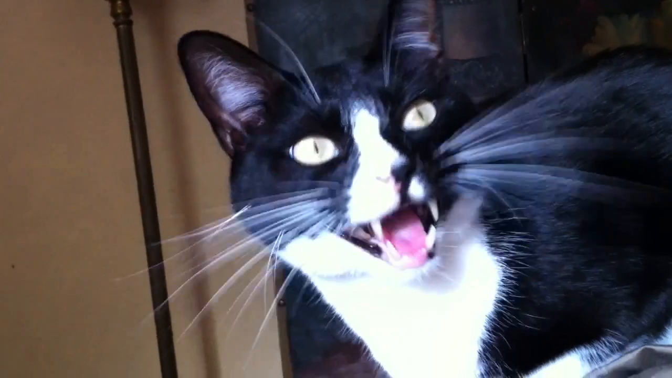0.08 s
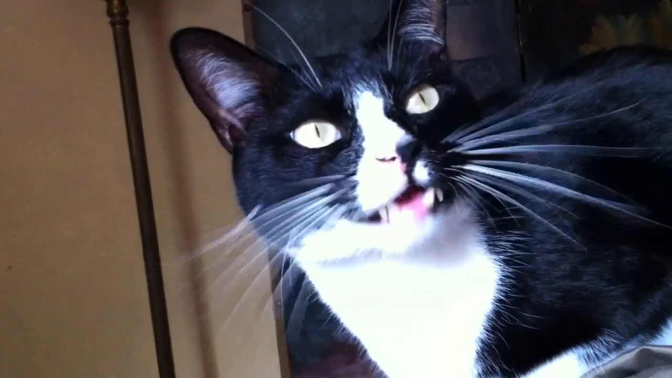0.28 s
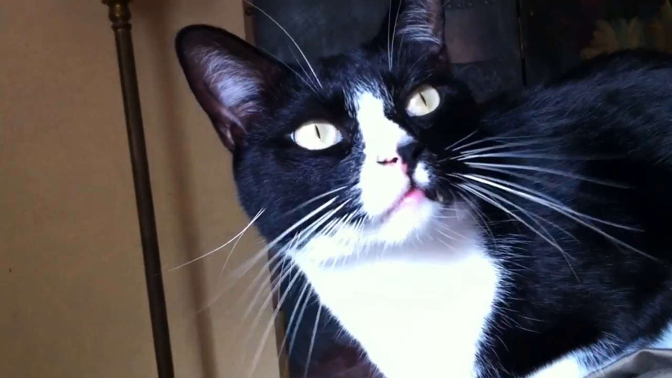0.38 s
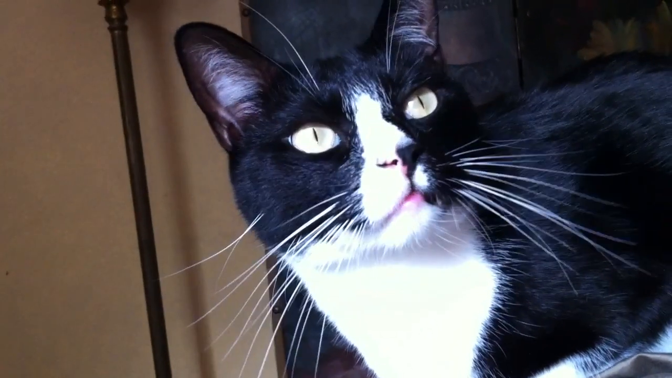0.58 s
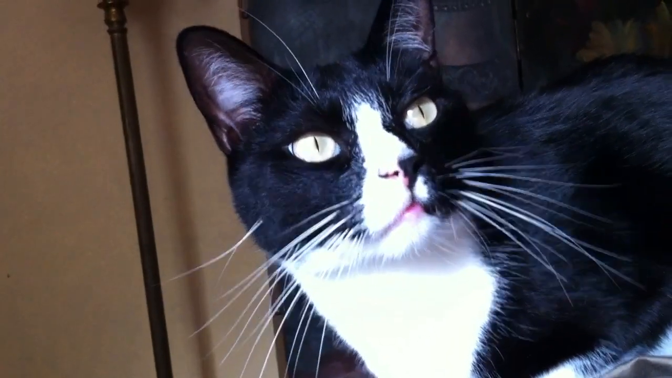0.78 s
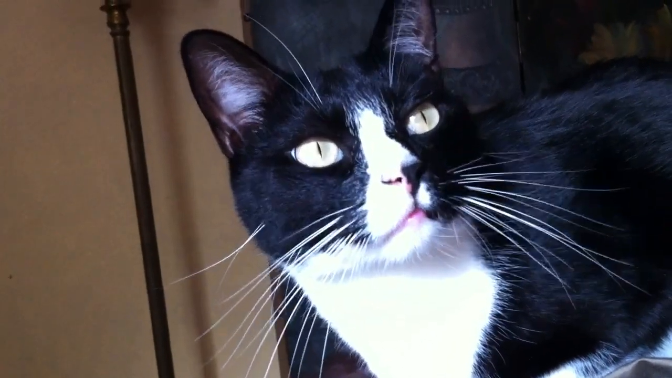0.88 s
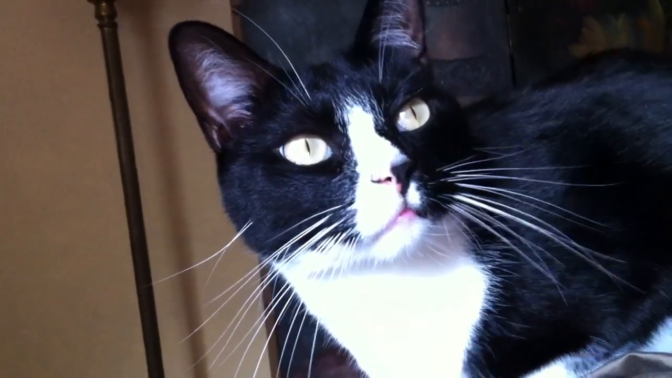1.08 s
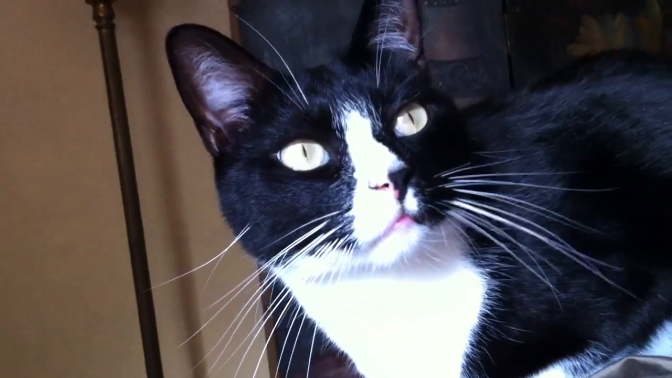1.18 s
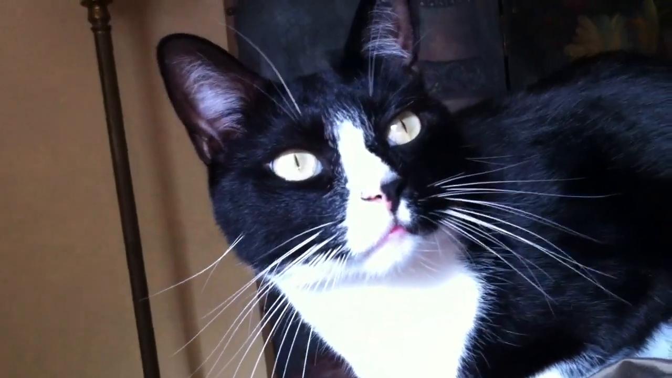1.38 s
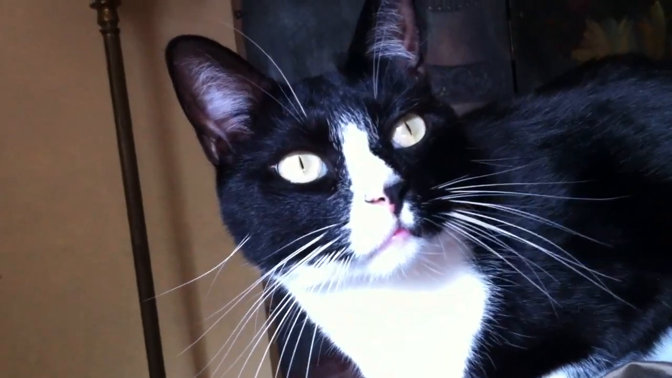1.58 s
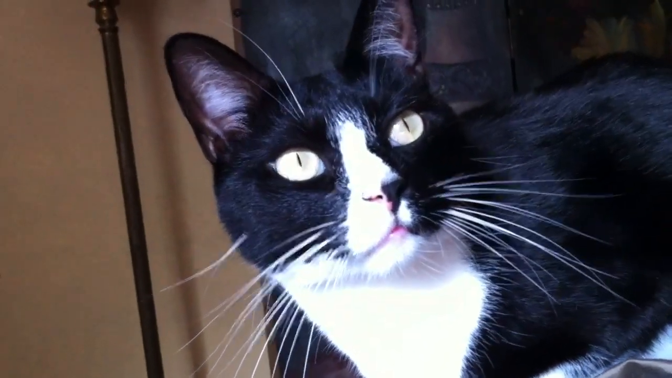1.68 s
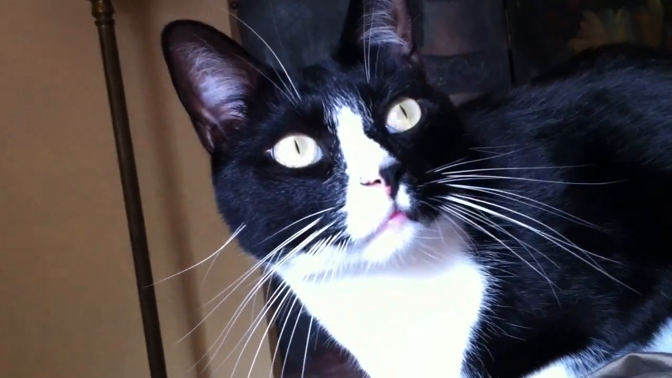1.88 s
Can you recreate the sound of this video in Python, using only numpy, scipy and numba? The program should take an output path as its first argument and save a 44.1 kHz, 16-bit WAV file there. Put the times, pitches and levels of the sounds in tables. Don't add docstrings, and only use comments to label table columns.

```python
import sys
import numpy as np
from scipy import signal
from scipy.fft import rfft, irfft
from scipy.io import wavfile
from scipy.ndimage import uniform_filter1d
from numba import njit

SR = 44100
rng = np.random.default_rng(int(sys.argv[2]) if len(sys.argv) > 2 else 0)


def boost_factor(decibels):
    exponent = np.asarray(decibels, float) / 20
    return 10 ** exponent


def store_wav(level_fs):
    pcm = np.round(np.clip(np.atleast_2d(level_fs), -1, 1) * 32767)
    wavfile.write(sys.argv[1], SR, pcm.T.astype(np.int16))


N = 83790


def rms_one(x):
    return x / np.sqrt(np.mean(x ** 2) + 1e-20)


def in_time(rows):
    s, *columns = np.transpose(rows)
    return [np.interp(np.arange(N) / SR, s, c) for c in columns]


def low_pass(x, hz, order):
    return signal.sosfilt(signal.butter(order, hz, fs=SR, output="sos"), x)


def low_cut(x, hz):
    return signal.sosfilt(signal.butter(6, hz, "high", fs=SR, output="sos"), x)


def drift(hz):
    return rms_one(low_pass(rng.standard_normal(N), hz, 2))


def clicks(s, size):
    out, at = np.zeros(N + 16), np.asarray(s) * SR
    for k in range(-5, 7):
        d = k - at % 1
        sinc = np.sinc(d) * np.cos(np.pi * d / 12) ** 2
        np.add.at(out, at.astype(int) + k, size * sinc)
    return out[:N]


def ring(x, hz, t60):
    r, w = boost_factor(-60 / (t60 * SR)), 2 * np.pi * hz / SR
    return signal.lfilter([0, np.sin(w)], [1, -2 * r * np.cos(w), r * r], x + 1e-18)


@njit
def resonate(x, w, r):
    y = np.zeros(len(x))
    for i in range(2, len(x)):
        drive = (1 - r * r) / 2 * (x[i] - x[i - 2])
        y[i] = drive + 2 * r * np.cos(w[i]) * y[i - 1] - r * r * y[i - 2]
    return y


def resonance(x, hz, width_hz):
    return resonate(x, 2 * np.pi * hz * np.ones(N) / SR, np.exp(-np.pi * width_hz / SR))


def tract(x, hz, width_hz):
    return resonance(resonance(x, hz, 2 * width_hz), hz, width_hz)


def hiss():
    # f/Hz, level/dB
    noise_shape = [(30, -16), (70, -27), (125, -3.5), (220, -1), (350, -1), (600, -8), (2500, -12.5),
                   (15000, -18)]
    hz, db = np.transpose(noise_shape)
    f = np.fft.rfftfreq(N, 1 / SR) + 1
    gain = boost_factor(np.interp(np.log(f), np.log(hz), db))
    return boost_factor(-65) * rms_one(irfft(rfft(rng.standard_normal(N)) * gain, N))


def hum():
    hz, width_hz = 259, 45
    waver = resonance(resonance(rng.standard_normal(N), hz, width_hz), hz, width_hz)
    tone = np.sin(2 * np.pi * hz * np.arange(N) / SR)
    return boost_factor(-74) * rms_one(waver) + boost_factor(-69.5) * tone


def room(x):
    level_db, t60_s, first_echo_s = -22, .25, .006
    t = np.arange(SR // 2) / SR
    tail = signal.lfilter([.4], [1, -.6], rng.standard_normal(len(t)))
    tail = tail * boost_factor(-60 * t / t60_s) * (t > first_echo_s)
    return boost_factor(level_db) * signal.fftconvolve(x, tail / np.sqrt(np.sum(tail ** 2)))[:N]


def sniff():
    # t/s, f/Hz, level/dB
    whistle = [
        (.985, 600, -98),
        (1.0, 624, -67.5),
        (1.05, 790, -71.5),
        (1.085, 890, -73),
        (1.1, 910, -106),
    ]
    hz, db = in_time(whistle)
    return boost_factor(db) * rms_one(resonance(resonance(rng.standard_normal(N), hz, 110), hz, 110))


def smacks():
    # t/s, level/dB
    partings = [
        (.8605, -55),
        (.8615, -58),
        (.8635, -61),
    ]
    # f/Hz, level/dB, T60/s
    mouth_modes = [(2400, 5, .018), (1970, -4, 0.011), (3720, -0.5, 0.039), (4950, 6, 0.0057),
                   (5510, 5, 0.02), (6730, -13, .006)]
    s, db = np.transpose(partings)
    return sum(ring(clicks(s, boost_factor(db + level_db)), hz, t60) for hz, level_db, t60 in mouth_modes)


def purr():
    # first beat t/s, beat period/s, number of beats, level/dB
    breaths = [
        (1.085, .039, 8, -62),
        (1.4685, .0404, 11, -55),
    ]
    # t/s, level/dB
    knocks = [
        (.05, -59),
        (.667, -56),
        (.915, -59),
    ]
    # f/Hz, level/dB, T60/s
    chest_modes = [(125, -3, .12), (190, 0, .04), (320, -1, .03), (460, -5, .03), (950, -16, .02)]
    jitter_s, uneven_db, mode_uneven_db = .00085, 1.5, 2
    strikes = [tuple(knock) for knock in knocks]
    for start, period, count, level_db in breaths:
        for k in range(int(count)):
            beat_s = start + k * period + rng.normal(0, jitter_s)
            strikes.append((beat_s, level_db + uneven_db * rng.normal()))
    s, db = np.transpose(strikes)
    out = np.zeros(N)
    for hz, level_db, t60 in chest_modes:
        strike_db = db + level_db + rng.normal(0, mode_uneven_db, len(s))
        out = out + ring(clicks(s, boost_factor(strike_db)), hz, t60)
    return low_cut(out / 2, 110)


def vocal_folds(half_hz, alternation, rough, unsteady):
    waver, waver_hz, weak_late = .009, 60, .057
    t = np.arange(N) / SR
    cycles = np.cumsum(2 * half_hz * (1 + waver * unsteady * drift(waver_hz))) / SR
    k = np.arange(1, int(cycles[-1]) - 1)
    s = np.interp(k, cycles, t)
    i = (s * SR).astype(int)
    size_chance, time_chance = rng.standard_normal((2, len(k)))
    late = weak_late * alternation[i] * (k % 2)
    size = (1 + alternation[i] * (-1.) ** k) * boost_factor(9 * rough[i] * size_chance)
    pulse_s = s + (.12 * rough[i] * time_chance + late) / half_hz[i]
    pulses = rms_one(clicks(pulse_s, size))
    breath = .67 * rough * rng.standard_normal(N)
    breath = breath + .12 * low_cut(rng.standard_normal(N), 2020)
    return pulses + breath * (1 + np.cos(2 * np.pi * cycles))


def vocal_tract(folds, mouth_hz, bright_db, unsteady, creaking):
    # t/s, f/Hz, level/dB
    tongue = [
        (.2, 5000, -20),
        (.25, 5110, -19),
        (.36, 4370, -16),
        (.42, 4230, -14.5),
        (.47, 4450, -18),
        (.55, 4680, -22.5),
        (.65, 4950, -21.5),
        (.69, 4950, -31),
        (.85, 5030, -20),
    ]
    # f/Hz, width/Hz, level/dB, share of brightness, sign
    throat = [(732, 463, -11, -0.233, -1), (1450, 710, -11, 0.9, -1), (3084, 524, -0.5, 3, 1),
              (1944, 640, -4.5, 8, 1), (5680, 210, -25.5, 1.5, 1)]
    top_hz, top_db = in_time(tongue)
    mouth_width_hz = 242

    def flutter():
        return boost_factor(4 * unsteady * drift(20))

    mouth_gain = boost_factor(7 + 1.21 * bright_db) * flutter()
    out = mouth_gain * tract(folds, mouth_hz, mouth_width_hz)
    second_gain = boost_factor(3 + 1.94 * bright_db)
    out = out + second_gain * tract(folds, 1.193 * mouth_hz, mouth_width_hz)
    out = out - boost_factor(top_db) * flutter() * tract(folds, top_hz, 370)
    for n, (hz, width_hz, level_db, share, sign) in enumerate(throat):
        gain = sign * boost_factor(level_db + share * bright_db)
        if n == 0:
            hz = np.where(creaking, 880, hz)
        else:
            gain = gain * flutter()
        out = out + gain * tract(folds, hz, width_hz)
    nose_hz = 1810
    nose_open = np.clip((mouth_hz - nose_hz - 120) / 150, 0, 1)
    out = out - .85 * nose_open * resonance(out, nose_hz, 420)
    out = out - .5 * resonance(out, 3920, 300)
    return out + creaking * boost_factor(-17) * tract(folds, 410, 200)


def meow():
    # t/s, half pitch f/Hz, level/dB, mouth resonance f/Hz, brightness/dB
    squeak = [
        (.197, 383, -66, 2330, -32.5),
        (.199, 378.5, -42, 2320, 1),
        (.213, 370.2, -53, 2480, 0.5),
        (.222, 410.5, -42, 2520, -1),
        (.234, 426.8, -41.5, 2730, -1.5),
        (.242, 385, -47, 2560, 3),
    ]
    cry = [
        (.2455, 372, -47, 2500, -1),
        (.2465, 368, -35, 2500, -1),
        (.258, 335, -33, 2450, -1),
        (.272, 305, -35, 2300, -1),
        (.33, 299, -36, 2150, -2),
        (.385, 297, -40, 2000, -3),
        (.408, 299, -38, 1780, -4),
        (.44, 318, -44, 1550, -6),
        (.485, 330, -48, 1300, -9),
    ]
    hummed = [
        (0.504, 341.7, -50, 1378, -16.5),
        (.545, 345.8, -48.5, 1296, -18),
        (0.613, 358.9, -49.5, 1299, -15),
        (0.667, 343.5, -50, 1360, -35),
        (.685, 331.8, -56, 1555, -25),
        (0.718, 352.4, -49.5, 1450, -39),
        (0.753, 346.4, -52.5, 1450, -51),
        (0.769, 344.2, -55.5, 1450, -28),
        (0.794, 341.2, -53, 1450, -36),
    ]
    creak = [
        (0.8, 335, -58, 1500, -34),
        (.803, 320.4, -54.5, 1560, -18),
        (0.829, 439.3, -51.5, 1600, -35),
        (.836, 436, -68, 1600, 3.5),
        (.843, 437, -50.5, 1518, -33),
        (0.856, 393, -55.5, 1570, -9),
        (0.858, 400, -68, 1500, -16),
    ]
    # t/s, strong-weak alternation 0-1, roughness 0-1, growl 0-1
    quality = [(.2, .3, .18, 0), (.24, .35, .25, 0), (.247, .5, .06, 0), (.26, .9, .1, 0),
               (.285, .55, .06, 0), (.42, .5, .06, 0), (.433, .7, .17, .7), (.478, .7, .16, .6),
               (.5, .05, .05, 0), (.53, .05, .05, 0), (.54, .3, .07, 0), (.555, .04, .04, 0),
               (.66, .05, .06, 0), (.7, .1, .12, .1), (.79, .2, .16, .15), (.8, .7, .22, .7),
               (.835, .7, .22, .6), (.845, .55, .2, .1)]
    half_hz, db, mouth_hz, bright_db = in_time(np.vstack([squeak, cry, hummed, creak]))
    alternation, rough, growl = in_time(quality)
    t = np.arange(N) / SR
    creaking = t > creak[0][0]
    unsteady = np.clip((t - cry[-1][0]) / .05, .35, 1)

    folds = vocal_folds(half_hz, alternation, rough, unsteady)
    out = vocal_tract(folds, mouth_hz, bright_db, unsteady, creaking)
    out = np.where(creaking, low_cut(out, 320), low_cut(out, 553))
    out = low_pass(out, 6100, 6)

    growl_start_s, growl_period_s, growl_db = .4335, .01367, 13
    saw = uniform_filter1d(.5 - (t - growl_start_s) / growl_period_s % 1, size=60)
    db = db + growl_db * growl * saw
    even = np.sqrt(uniform_filter1d(out ** 2, int(.012 * SR)) + 1e-12)
    return out / even * boost_factor(db) * (t > squeak[0][0]) * (t < creak[-1][0])


def scene():
    cat = meow() + smacks() + purr() + sniff()
    return (cat + room(cat) + hum() + hiss())[None]


def roll_off(x):
    return signal.sosfilt(signal.butter(12, 15900, fs=SR, output="sos"), x)


def record(dry):
    return roll_off(dry)


dry = scene()
out = record(dry)
store_wav(out)
```